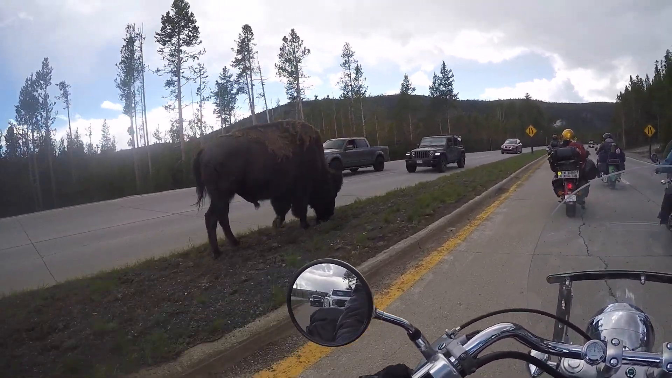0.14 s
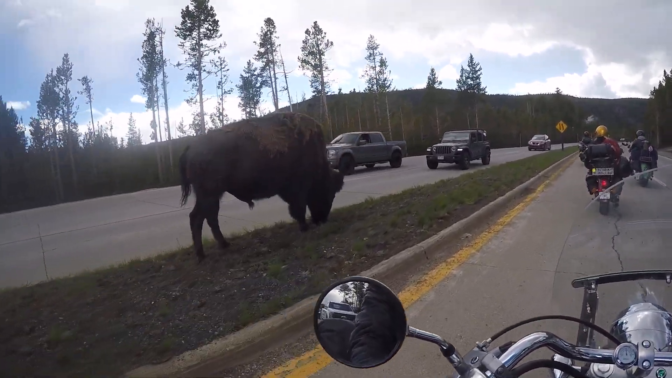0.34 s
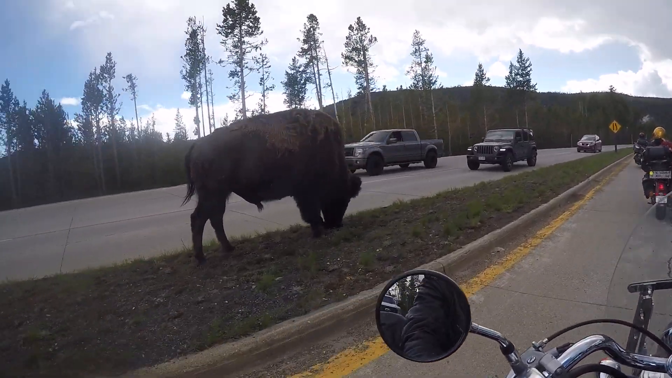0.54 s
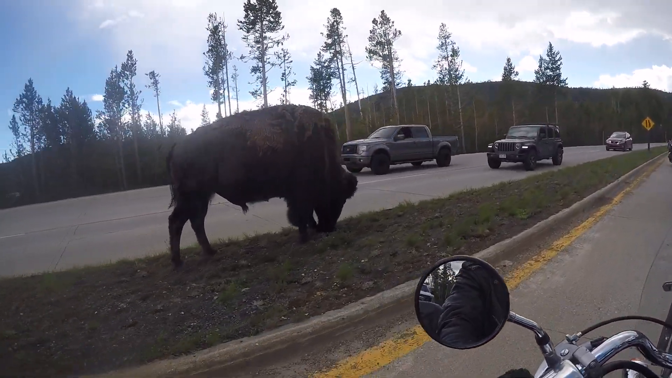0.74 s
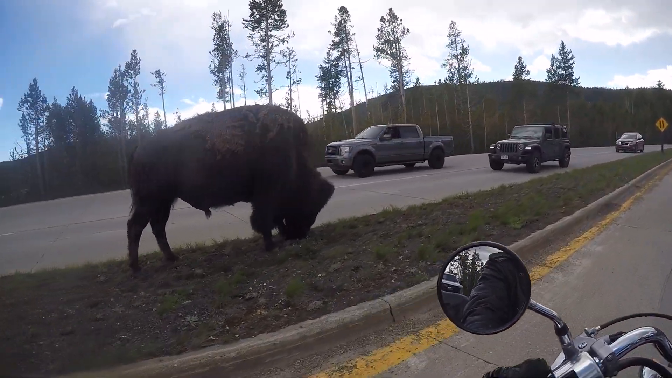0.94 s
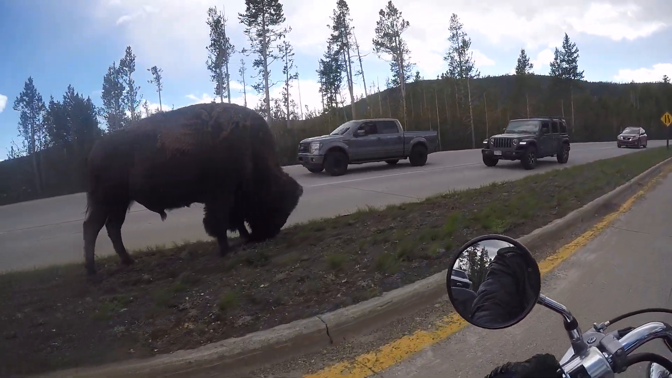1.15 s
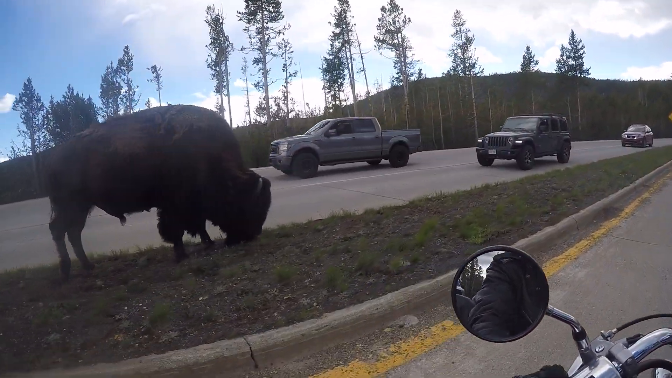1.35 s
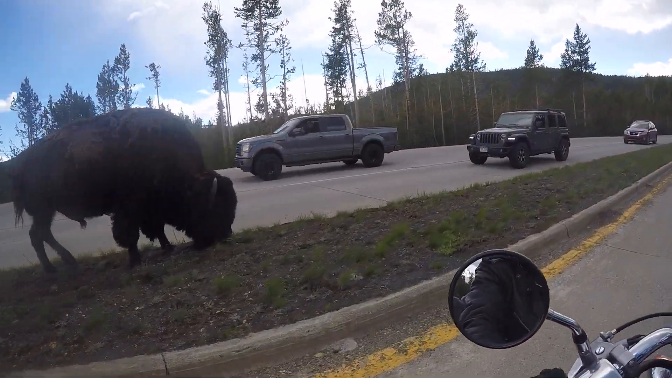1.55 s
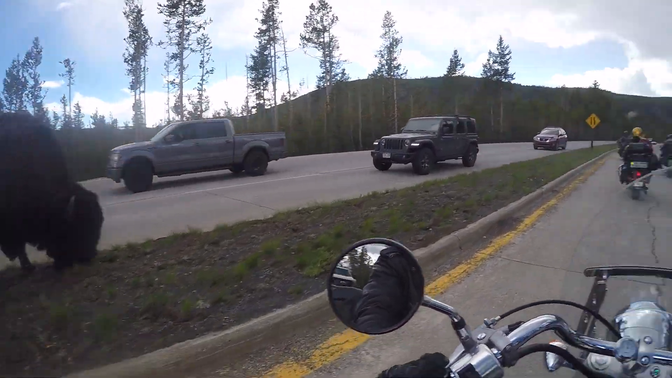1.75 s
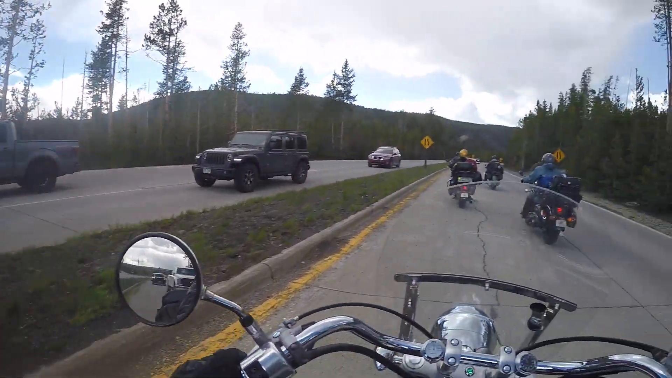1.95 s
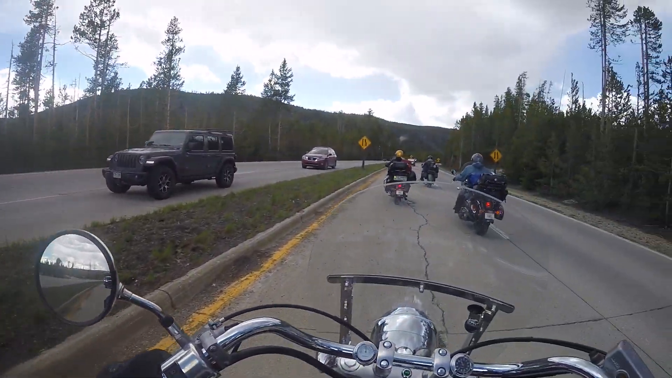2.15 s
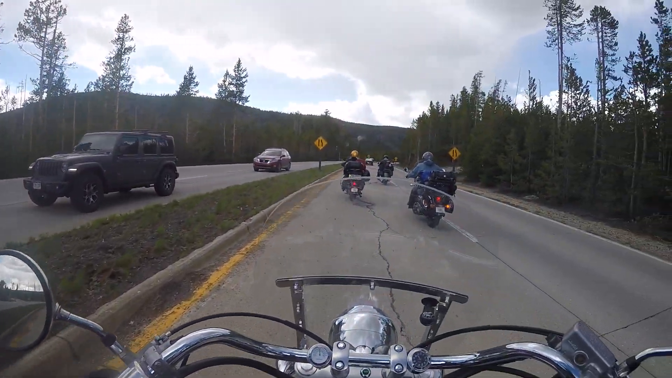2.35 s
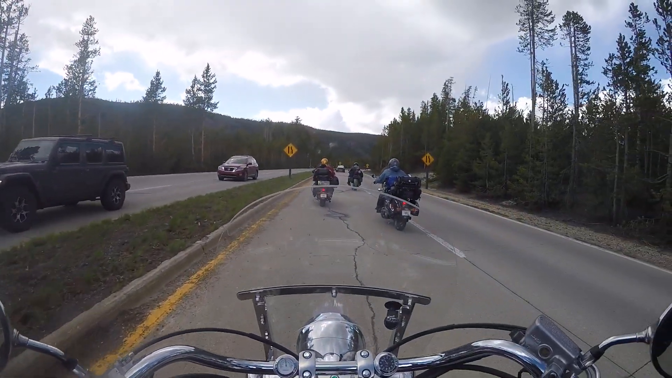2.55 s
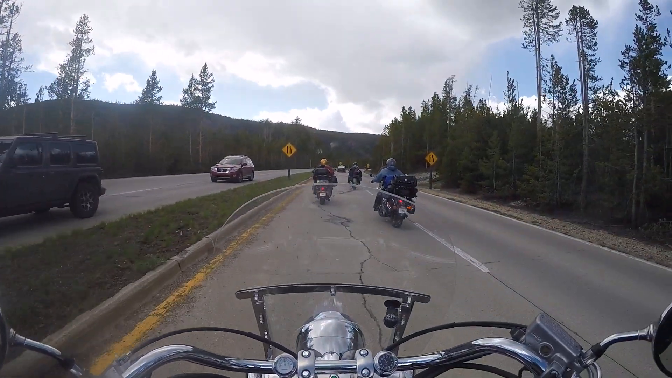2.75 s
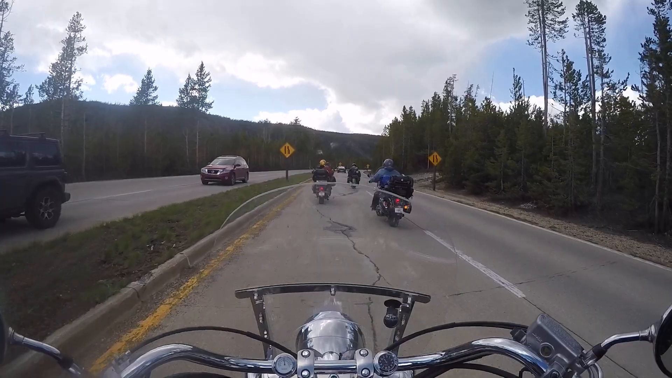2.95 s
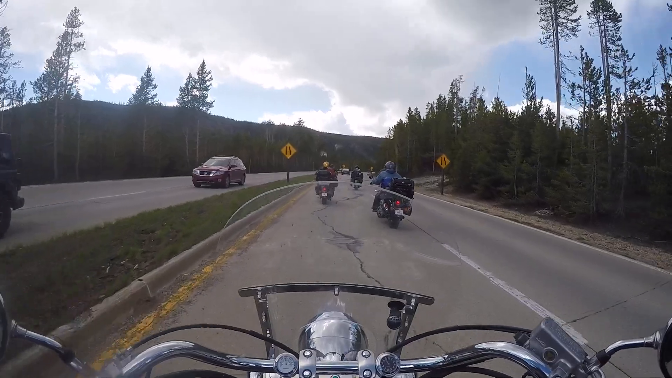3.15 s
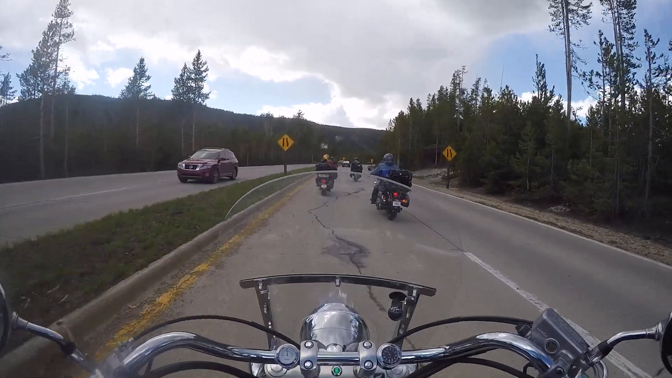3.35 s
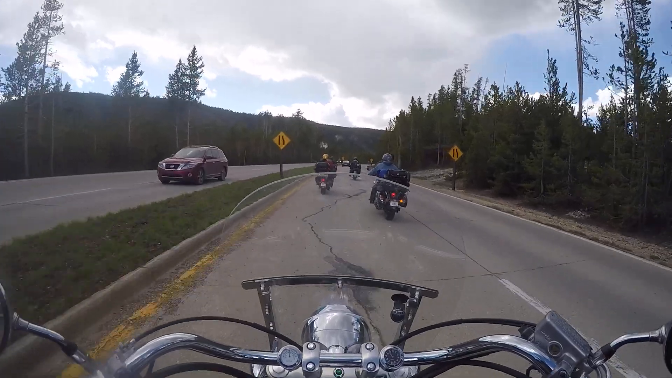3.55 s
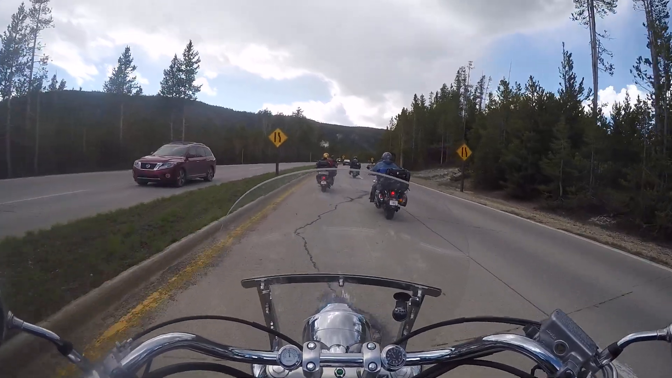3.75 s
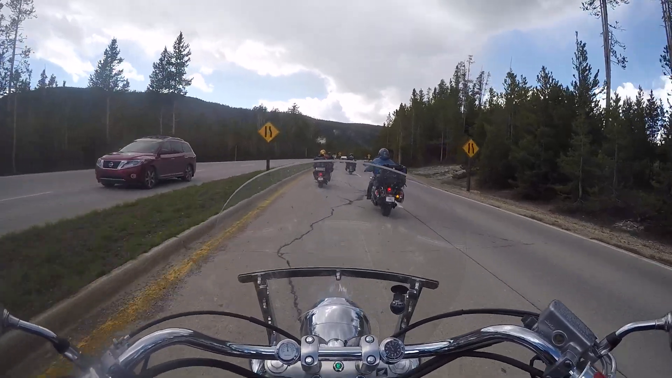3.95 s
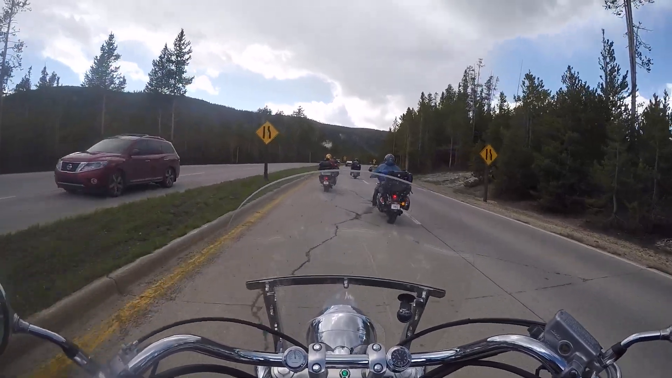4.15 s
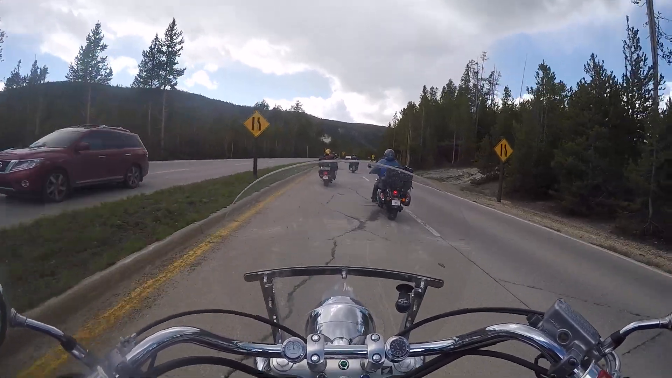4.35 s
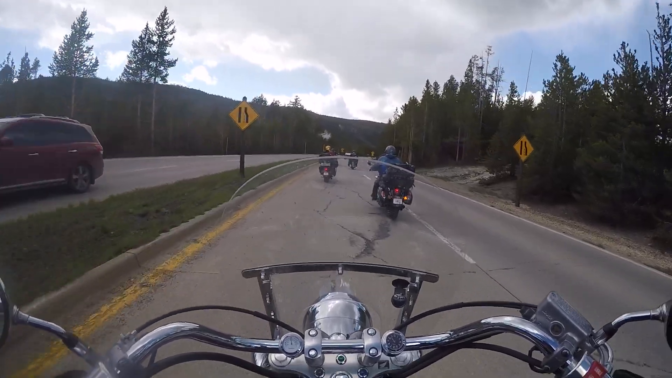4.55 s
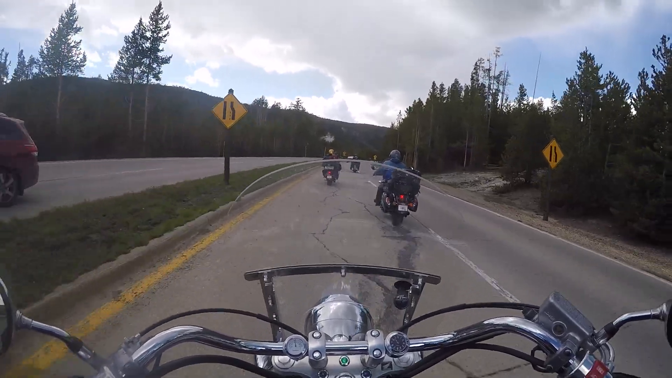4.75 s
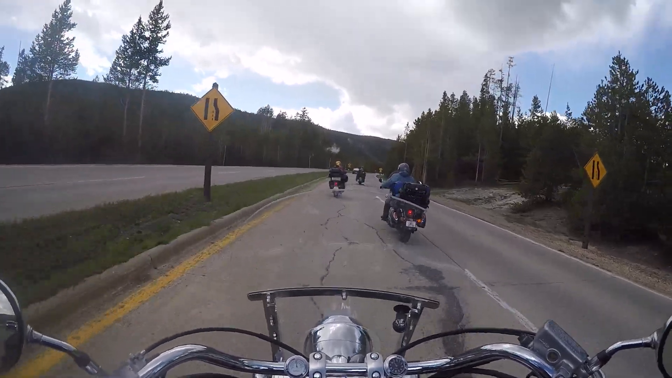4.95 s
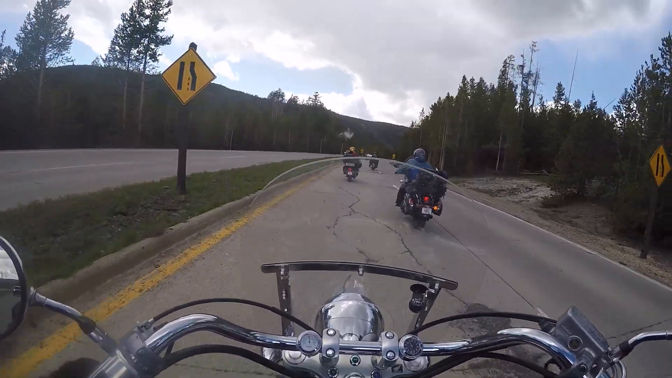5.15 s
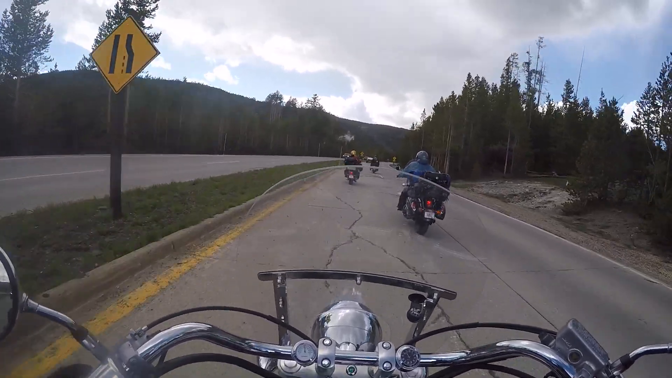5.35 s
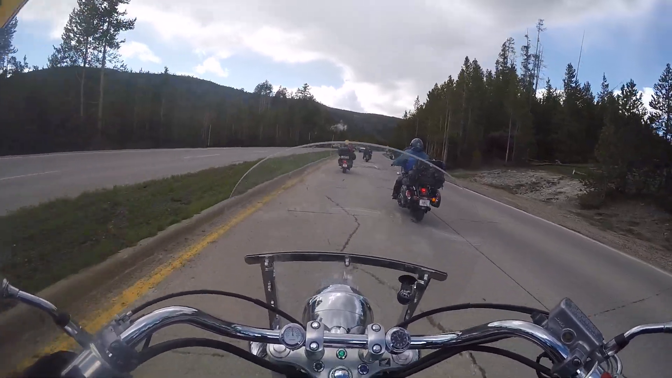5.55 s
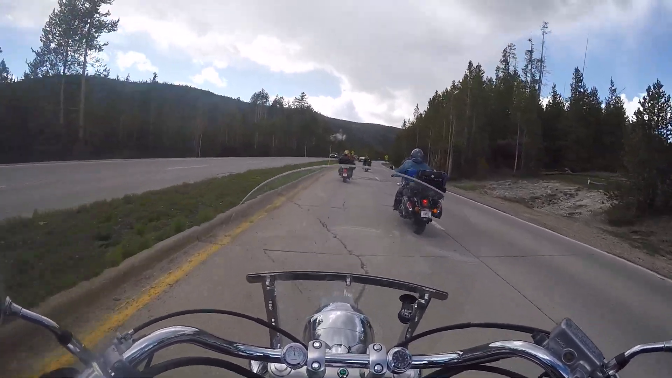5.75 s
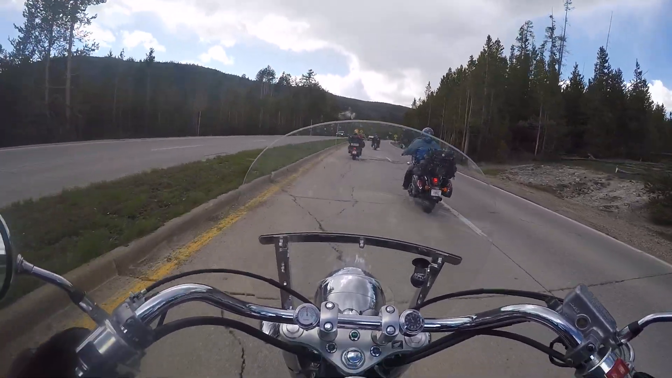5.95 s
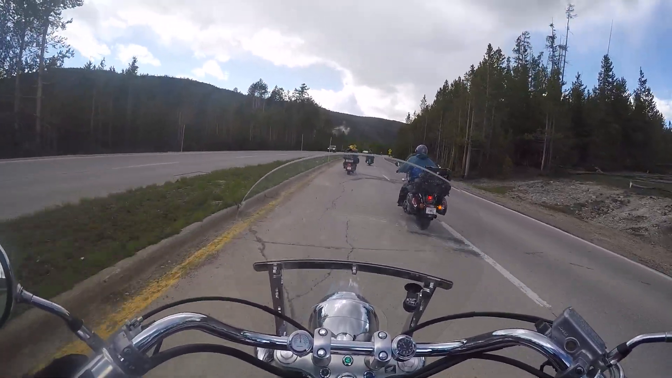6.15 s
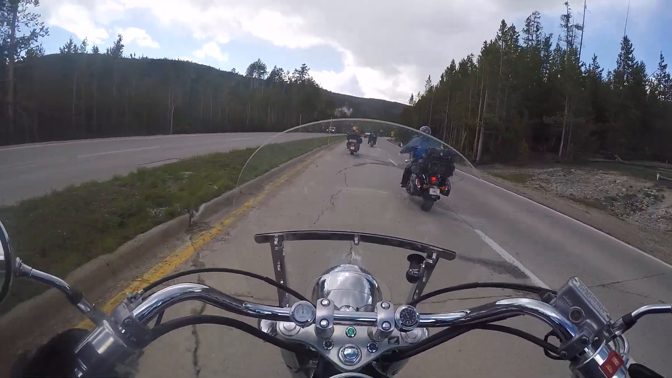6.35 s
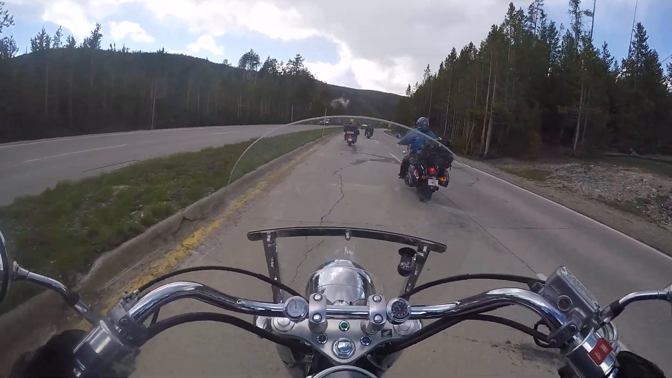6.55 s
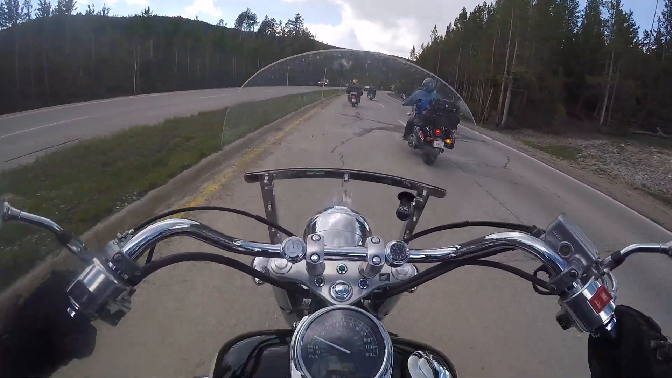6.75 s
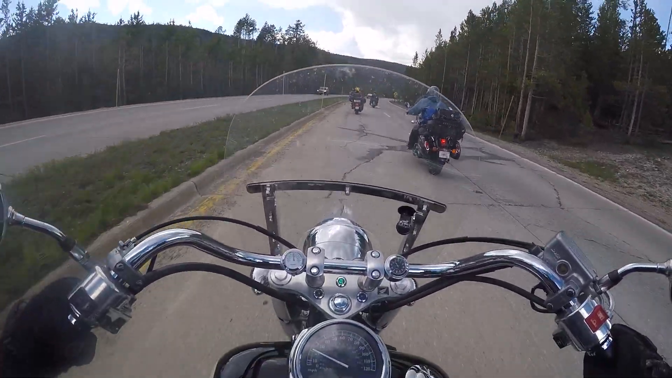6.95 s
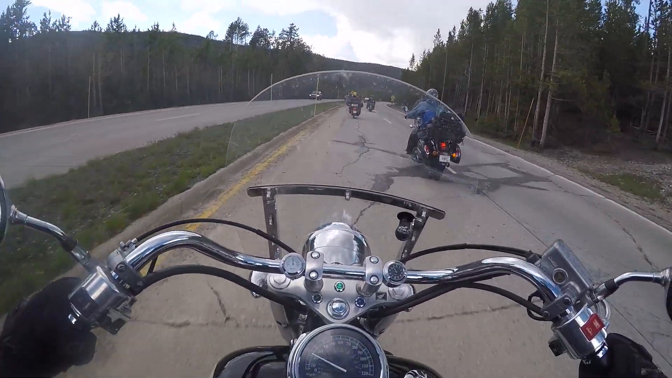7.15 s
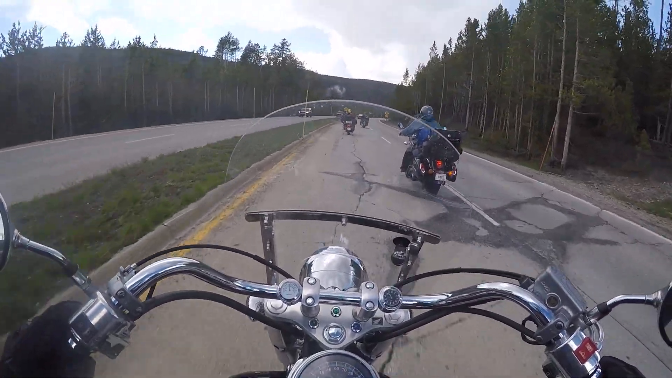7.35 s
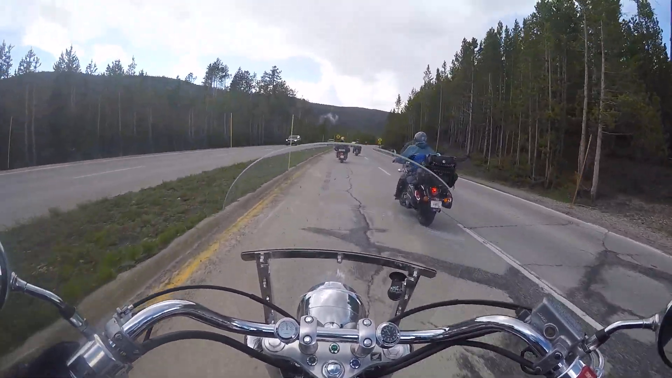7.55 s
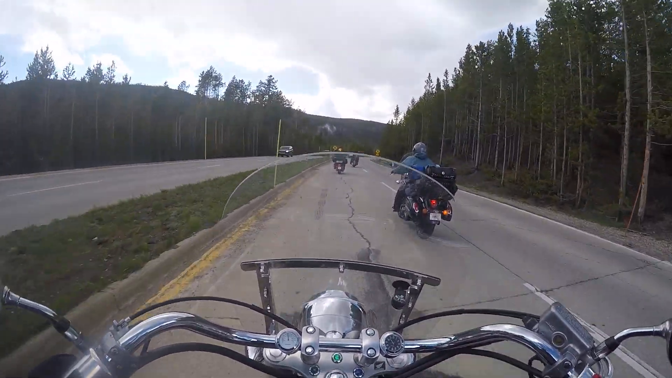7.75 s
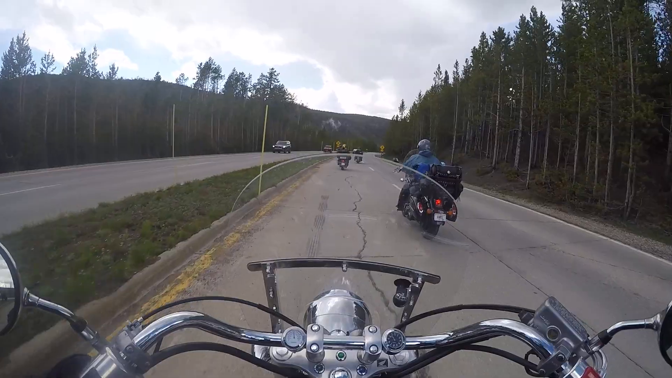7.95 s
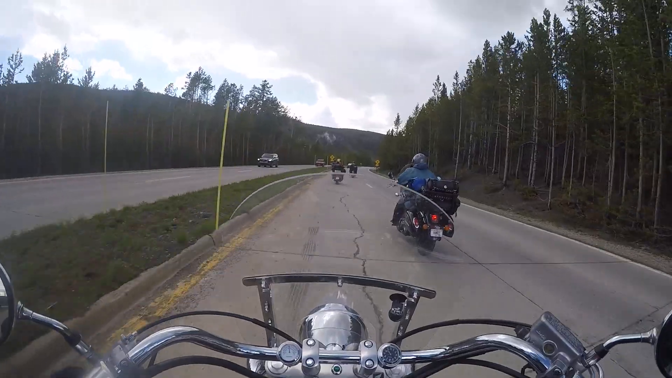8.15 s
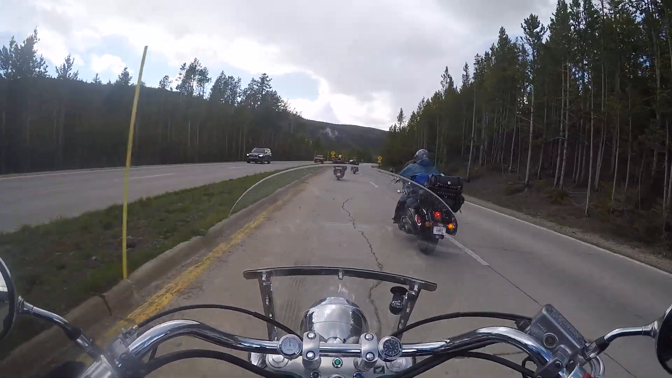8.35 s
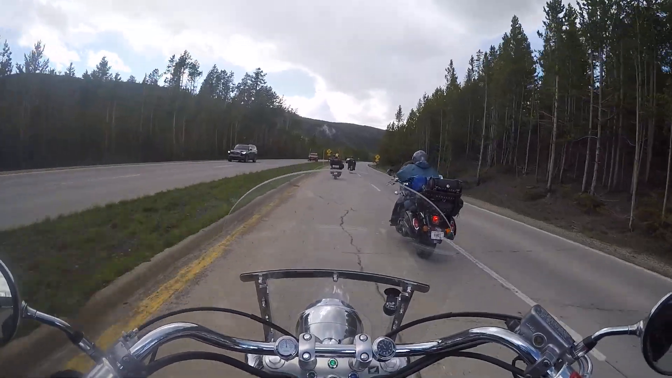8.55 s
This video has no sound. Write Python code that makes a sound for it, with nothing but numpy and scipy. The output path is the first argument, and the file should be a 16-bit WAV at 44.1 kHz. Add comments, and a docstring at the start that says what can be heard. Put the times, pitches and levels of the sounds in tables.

```python
"""An open concrete road, from the saddle of a V-twin cruiser pulling away beside a companion.
The ridden bike's uneven firings thump in the silencers, air rasps through its valves and its tappets tick.
The companion revs higher: its pipes drone, bark and crack, loose metal rattles and drive gears whine.
Each changes up once, while two more bikes rumble ahead and fade. Tyres hiss, and as the pace builds
the wind buffets the microphone's case harder; that case colours the whole mix."""
import sys
import numpy as np
from scipy import signal
from scipy.fft import rfft, irfft, next_fast_len
from scipy.io import wavfile

SR = 44100
rng = np.random.default_rng(int(sys.argv[2]) if len(sys.argv) > 2 else 0)


def master_out(mix):
    """Clip the mix to full scale and print it as 16-bit PCM to the path in sys.argv[1]."""
    frames = np.transpose(np.atleast_2d(mix))
    ceiling = np.clip(frames, -1, 1)
    pcm = np.round(ceiling * 32767).astype(np.int16)
    wavfile.write(sys.argv[1], SR, pcm)


N = 379701
TIME = np.arange(N) / SR

# The tone of each layer. Each row: frequency in Hz, relative spectral level in dB.
BUFFET_EQ = [(8, -15.5), (15, -12), (18.5, 2.5), (22, -10.5), (35, -9.5), (55, -18.5), (90, -11),
             (200, -23.5), (500, -51), (1500, -66)]  # wind on the case
RUSH_EQ = [(60, 0), (250, 1), (520, -1), (680, -2), (1000, -1), (1250, 0), (1700, 2), (3000, -1),
           (5400, -6), (6300, -12), (9000, -15), (11000, -24), (16000, -29)]  # wind, tyres and gas
RUMBLE_EQ = [(25, -23), (60, -13.5), (95, 1), (135, -6), (185, -5), (235, -3.5), (300, -17), (400, -19),
             (560, -22.5), (620, -21), (680, -59), (1500, -53)]  # bikes ahead, dulled by distance
DRONE_EQ = [(20, -9), (60, -0.5), (100, 8), (160, -1), (210, -1.5), (290, 5.5), (350, -8), (425, -1),
            (500, -11), (590, -13), (680, -18), (1200, -45), (2500, -49)]  # companion's pipes
BARK_EQ = [(300, -15), (500, -16), (630, -11), (730, 8.5), (810, -2.5), (930, 5.5), (1200, -5), (1400, -10),
           (1750, -4.5), (2500, -13), (5000, -34)]  # its pulses under load
CRACK_EQ = [(500, -31), (1100, -21), (1700, -4.5), (3000, -25.5), (4200, 6.5), (5400, 4.5), (6050, 0),
            (6500, -7.5), (8200, -4.5), (9400, -9), (10300, -12.5), (13500, -14.5), (15500, -16.5)]  # puffs leaving its pipes
TICK_EQ = [(500, -41), (800, -21), (1300, -9), (1700, -5), (2600, 7), (4000, -2), (5400, -6), (6100, -13),
           (8800, -10.5), (11000, -19.5), (16000, -50)]  # ridden bike's tappets
RASP_EQ = [(300, -39), (900, -19), (1200, -3), (1500, -15.5), (1650, -2.5), (2100, -1), (2800, 1),
           (3600, -3), (4500, -7), (5500, -14.5), (6200, -12.5), (8000, -24), (11000, -33), (16000, -39)]  # air through its valves
THUMP_EQ = [(15, -8.5), (40, -13), (62, -14), (82, -3), (100, 6.5), (125, 1.5), (158, 3.5), (200, -11),
            (250, -7), (340, -23.5), (560, -20.5), (670, -38), (1500, -74.5)]  # its silencers
# Resonances and hollows of the case. Each row: centre in Hz, width in Hz, gain in dB.
CASE_EQ = [(718, 12, 1.5), (756, 17, 1.5), (897, 61, 5.5), (1195, 43, -21.5), (1377, 49, 5.5),
           (1663, 160, 6), (1855, 160, 6.5), (2030, 81, -5), (2440, 51, 3), (2954, 35, 7),
           (3420, 160, -1.5), (5550, 130, 4), (6010, 330, -7.5), (9160, 210, -1.5)]
# The companion's loose metal. Each row: mode frequency in Hz, level in dB, time to fall 60 dB in seconds.
METAL_MODES = [(2585, -7.5, 0.075), (2950, -8.5, 0.016), (3970, 4, 0.012), (4360, -2.5, 0.027),
               (5200, 6, 0.0048), (5290, -7, 0.034), (6380, -2.5, 0.02), (8040, -7, 0.017),
               (9000, -20, 0.0057), (9170, 2, 0.011)]
# Echoes inside the pipes and silencer chambers. Each entry: a pulse's round trip in seconds.
PIPE_TRIPS_S = [0.003203, .0067, .0113]
# Clicks of the valve gear. Each row: place in the cycle from 0 to 1, level in dB.
TAPPET_CLICKS = [(.04, -18), (.42, -13), (0.588, 1.5), (0.857, 2)]
# Voicing of the pipes. Each entry: boost or cut in dB for a multiple of the cycle rate, from the second up.
RIDDEN_HARMONICS_DB = [-3, -8, -8, 3.5, 3.5, 1.5, 0.5, 3]
COMPANION_HARMONICS_DB = [-7, -3.5, -7, 1.5, 1, 2.5, -0.5, -1.5, 2, 7.5, 2, -0.5]
# The companion's drive gears. Each entry: a tone's pitch as a multiple of the cycle rate.
GEAR_MULTIPLES = [18, 23, 28]

# Engine speed. Each row: time in seconds, four-stroke cycles per second.
RIDDEN_REVS = [(0, 11.01), (1.22, 11.81), (1.57, 14.55), (1.79, 12.9), (2.16, 19.56), (2.68, 17.67),
               (3.06, 14.91), (3.9, 20.87), (4.78, 26.64), (5.11, 17.15), (5.79, 17.2), (8.61, 23.77)]  # rolls, takes up the clutch, pulls, changes up, pulls again
COMPANION_REVS = [(0, 11.12), (.34, 9.54), (1.38, 12.72), (2.99, 16.73), (4.12, 20.73), (6.35, 29.45),
                  (6.66, 21.43), (7.06, 19.19), (8.61, 22.26)]  # one long pull, then a change up
# The two bikes ahead. Each row: time in seconds, cycles per second of one, then of the other.
GROUP_REVS = [(0, 12.5, 9), (1.2, 15, 11.5), (2.3, 18.5, 17), (3.2, 22, 19), (5, 19, 24), (8.61, 24, 21)]
# Throttle moves. Each row: time in seconds, opening from 0 to 1.
RIDDEN_OPENING = [(0, 0.06), (.9, 0.13), (1.6, 0.39), (2.25, 0.5), (2.6, 0.92), (3.7, 1), (4.85, 0.91),
                  (4.96, 0.26), (5.55, 0.53), (6, 0.88), (6.75, 0.94), (8.45, 0.88), (8.61, 0.54)]
COMPANION_OPENING = [(0, 0.52), (1.4, 0.57), (2, 0.75), (3.5, 0.92), (4.5, 0.84), (5.3, 0.82), (5.7, 0.83),
                     (6.36, 0.91), (6.44, 0.27), (6.7, 0.2), (6.97, 0.75), (7.75, 1), (8.61, 0.99)]
# Pace along the road. Each row: time in seconds, speed in metres per second.
ROAD_PACE = [(0, 3.5), (1.8, 3.8), (2.8, 5.1), (3.8, 9.4), (5, 10.8), (8.61, 12.8)]

# Swells on single layers. Each row: start in seconds, end in seconds, lift in dB.
GUST_SWELLS = [(4.95, 5.08, 4), (5.38, 5.5, 3.5), (7.45, 7.8, 3.5)]  # gusts strike the case
RATTLE_SWELLS = [(4.6, 5.6, 10.5), (5.95, 6.36, 10.5), (6.97, 7.35, 11)]  # the loose metal shakes harder
BARK_SWELLS = [(1.9, 6.36, 4.5), (1.9, 3.6, 4)]  # through first gear, most as the companion draws past
CRACK_SWELLS = [(6.22, 6.36, 3), (6.98, 7.3, 2.5)]  # at the top of its pull, and as it picks up again
CLATTER_SWELLS = [(1.25, 1.6, 4.5)]  # the valve gear clatters as the clutch begins to bite

CRUISE_CYCLES_PER_S, CRUISE_M_PER_S = 20, 12  # the revs and pace at which levels are set


def from_db(db):
    """Decibels to gain."""
    return 10 ** (np.asarray(db) / 20)


def unit_power(x):
    """Scale to an RMS of one."""
    return x / np.sqrt(np.mean(x ** 2) + 1e-20)


def curves(rows):
    """One smooth control curve for each column after the time."""
    times, *columns = np.transpose(rows)
    return [np.interp(TIME, times, column) for column in columns]


def swells(rows, attack_s, release_s):
    """A lift in dB that builds before each start, holds to the end and then dies away."""
    return sum(np.interp(TIME, [start - attack_s, start, end, end + release_s], [0, db, db, 0])
               for start, end, db in rows)


def drift(per_s):
    """A wobble that glides between random values of spread 1."""
    knots = rng.standard_normal(4000)
    return np.interp(TIME * per_s, np.arange(len(knots)), knots)


def flutter(spread_db, per_s):
    """A randomly wavering gain, held within twice its spread."""
    return from_db(spread_db * np.clip(drift(per_s), -2, 2))


def causal_filter(x, db_at, size=16384):
    """Minimum-phase filter with the response db_at(Hz): it rings only after each impulse."""
    hz = np.maximum(np.arange(size // 2 + 1) * SR / size, 1)
    cepstrum = irfft(np.log(from_db(db_at(hz))))
    cepstrum[1:size // 2] *= 2
    cepstrum[size // 2 + 1:] = 0
    return signal.oaconvolve(x, irfft(np.exp(rfft(cepstrum))))[:N]


def coloured(x, eq):
    """Shape x with an EQ curve that rolls off beyond its ends, then bring it to unit power."""
    points_hz, db = np.transpose(eq)
    octaves = np.log2(np.r_[points_hz[0] / 10, points_hz, points_hz[-1] * 10])
    db = np.r_[db[0] - 40, db, db[-1] - 60]
    return unit_power(causal_filter(x, lambda hz: np.interp(np.log2(hz), octaves, db)))


def patchy_noise(patchy_db, per_s, bands=12):
    """Turbulence whose treble bands swell and fade separately, so no two puffs have the same colour."""
    edges_hz = np.geomspace(1500, 16000, bands + 1)
    white = rng.standard_normal((2, N))
    out = signal.sosfilt(signal.butter(2, edges_hz[0], fs=SR, output="sos"), white[1])
    for k in range(bands):
        band_pass = signal.butter(2, edges_hz[k:k + 2], "band", fs=SR, output="sos")
        out += signal.sosfilt(band_pass, white[k % 2]) * unit_power(flutter(patchy_db, per_s))
    return out


def puffs(impulses, rise_s, decay_s, patchy_db):
    """Each impulse lets out a puff of turbulent noise."""
    age = np.arange(4096) / SR
    envelope = (1 - np.exp(-age / rise_s)) * np.exp(-age / decay_s)
    return signal.oaconvolve(impulses, envelope)[:N] * patchy_noise(patchy_db, per_s=50)


def strokes(revs, place, jitter, uneven_db, count=256):
    """One impulse per engine cycle at a given place in it, each a little off in time and strength."""
    cycles = np.cumsum(revs) / SR
    timing, strength = rng.standard_normal((count, 2)).T
    due = np.arange(count) + place + jitter * timing
    heard = (due > 0) & (due < cycles[-1])
    at = np.searchsorted(cycles, due[heard])
    out = np.zeros(N)
    out[at] = from_db(uneven_db * np.clip(strength[heard], -2, 2))
    return out / np.sqrt(revs)  # equal power at any revs


def effort(revs, throttle, db, octave_db, shut_db):
    """Engine gain: db at cruising revs, up octave_db per doubling, down shut_db with the throttle shut."""
    return from_db(db + octave_db * np.log2(revs / CRUISE_CYCLES_PER_S) - shut_db * (1 - throttle))


def pipe_voicing(revs, pattern, harmonics_db):
    """Clean tones that boost or cut the low harmonics of a firing pattern of (place in the cycle, gain)."""
    cycles, out = np.cumsum(revs) / SR, 0
    for multiple, db in enumerate(harmonics_db, 2):
        weight = sum(gain * np.exp(-2j * np.pi * multiple * place) for place, gain in pattern)
        harmonic = abs(weight) * np.cos(2 * np.pi * multiple * cycles + np.angle(weight))
        out += (from_db(db) - 1) * harmonic
    return out * 2 * np.sqrt(revs) / SR  # on the scale of the strokes


def in_pipes(x, reflection=0.5):
    """Each pulse bounces to and fro before it has all come out, which rounds it into a throb."""
    size = next_fast_len(N + SR)
    hz, spectrum = np.arange(size // 2 + 1) * SR / size, rfft(x, size)
    for trip_s in PIPE_TRIPS_S:
        delay = np.exp(-2j * np.pi * hz * trip_s)
        spectrum *= (delay - reflection) / (1 - reflection * delay)
    return irfft(spectrum, size)[:N]


def bikes_ahead(leave_s=2.5, swell_db_per_s=4.5, fade_db=12, fade_s=0.79):
    """Two exhausts blend into a low rumble that swells as they open up and fades as they leave."""
    swell = swell_db_per_s * np.minimum(TIME - leave_s, 0)
    fade = fade_db * (1 - np.exp(-np.maximum(TIME - leave_s, 0) / fade_s))
    firings = sum(strokes(revs, place, jitter=0.0036, uneven_db=4.5)
                  for revs in curves(GROUP_REVS) for place in (.1, .52))
    return from_db(-29 + swell - fade) * coloured(in_pipes(firings), RUMBLE_EQ)


def wind_buffet(pace_octaves):
    """Wind beats on the case: a lumpy low end that grows with the pace and jumps in gusts."""
    level_db = -20.5 + 6 * pace_octaves + swells(GUST_SWELLS, attack_s=0.1, release_s=0.088)
    return from_db(level_db + 0.27 * drift(10)) * coloured(rng.standard_normal(N), BUFFET_EQ)


def air_rush(pace_octaves, ridden, beside):
    """One smooth noise bed for wind and tyres, the ridden bike's hiss and the companion's roar of gas."""
    road = from_db(-50 + 1.5 * pace_octaves)
    hiss = effort(*ridden, db=-37, octave_db=11.5, shut_db=5.5)
    roar = effort(*beside, db=-42, octave_db=9.5, shut_db=15) * bark_lift()
    gain = np.sqrt(road ** 2 + hiss ** 2 + roar ** 2) * from_db(0.26 * drift(14))
    return gain * coloured(rng.standard_normal(N), RUSH_EQ)


def gear_whine(revs, throttle, tones_db=(-43, -43.5, -43.5), ring_hz=(370, 528)):
    """Meshing teeth sing fluttering tones; each stands out as the revs carry it into the gear case's ring."""
    cycles = np.cumsum(revs) / SR
    tones = sum(from_db(db) * flutter(spread_db=3, per_s=14) * np.sin(2 * np.pi * multiple * cycles)
                for multiple, db in zip(GEAR_MULTIPLES, tones_db))
    gear_case = signal.butter(2, ring_hz, "band", fs=SR, output="sos")
    return from_db(-5.5 * (1.5 - throttle)) * signal.sosfilt(gear_case, tones)


def metal_rattle(firings):
    """Each firing strikes every mode of the loose metal with a strength of its own."""
    knocks = puffs(firings, rise_s=0.00018, decay_s=0.0012, patchy_db=3)
    ringing = 0
    for hz, db, t60 in METAL_MODES:
        radius, angle = from_db(-60 / (t60 * SR)), 2 * np.pi * hz / SR
        strikes = knocks * from_db(db) * flutter(spread_db=4.5, per_s=60)
        feedback = [1, -2 * radius * np.cos(angle), radius ** 2]
        ringing += signal.lfilter([0, np.sin(angle)], feedback, strikes + 1e-18)
    low_pass = signal.butter(2, 10500, fs=SR, output="sos")
    dulled = signal.sosfilt(low_pass, signal.sosfilt(low_pass, ringing))
    return from_db(swells(RATTLE_SWELLS, attack_s=0.16, release_s=0.19)) * unit_power(dulled)


def exhaust_crack(firings):
    """Each firing leaves the pipe as a short, bright puff of gas."""
    gas = puffs(firings, rise_s=.0002, decay_s=.0024, patchy_db=5.5)
    return from_db(swells(CRACK_SWELLS, attack_s=0.18, release_s=0.042)) * coloured(gas, CRACK_EQ)


def bark_lift():
    """Extra gain on the companion's bark and roar through first gear."""
    return from_db(swells(BARK_SWELLS, attack_s=0.33, release_s=0.35))


def companion_bike(revs, throttle, front_db=-5, front_crack_db=-2.5):
    """Firings drone in the pipes, crack at their ends and shake metal; under load they steepen to a bark."""
    pattern = [(.178, from_db(front_db)), (.58, 1)]
    front, rear = [strokes(revs, place, jitter=.0024, uneven_db=1.2) for place, _ in pattern]
    firings = from_db(front_db) * front + rear
    drone = coloured(in_pipes(firings + pipe_voicing(revs, pattern, COMPANION_HARMONICS_DB)), DRONE_EQ)
    bark = bark_lift() * coloured(firings, BARK_EQ)
    crack = exhaust_crack(from_db(front_crack_db) * front + rear)
    return (drone * effort(revs, throttle, db=-26, octave_db=11, shut_db=13.5)
            + bark * effort(revs, throttle, db=-48, octave_db=16.5, shut_db=11.5)
            + crack * effort(revs, throttle, db=-30, octave_db=3, shut_db=41.5)
            + metal_rattle(firings) * effort(revs, throttle, db=-41, octave_db=7, shut_db=10)
            + gear_whine(revs, throttle))


def clutch_clack(at_s=1.502, decay_s=0.0075):
    """As the clutch bites, one hard contact in the drive rings the same metal as the tappets."""
    age = np.maximum(TIME - at_s, 0)
    envelope = (age > 0) * np.exp(-np.minimum(age / decay_s, 20))
    return from_db(-53) * coloured(envelope * rng.standard_normal(N), TICK_EQ)


def valve_ticks(revs):
    """Tappets click at set places in every cycle, never twice with the same strength."""
    level_db = -37.5 + 7 * np.log2(revs / CRUISE_CYCLES_PER_S)
    clatter_db = swells(CLATTER_SWELLS, attack_s=0.3, release_s=.1)
    taps = sum(from_db(db) * strokes(revs, place, jitter=.007, uneven_db=2.2)
               for place, db in TAPPET_CLICKS)
    clicks = puffs(taps, rise_s=0.00012, decay_s=0.006, patchy_db=8.5)
    return from_db(level_db + clatter_db) * coloured(clicks, TICK_EQ)


def throttle_rasp(revs, throttle, attack_cycles=0.013, decay_cycles=0.25, uneven_db=1.5, leak_db=-21):
    """Air tears through each cylinder's valve for part of the cycle, hardest just after it opens."""
    cycles, flow = np.cumsum(revs) / SR, from_db(leak_db)
    for opens, cylinder_db in [(.415, 1.6), (.84, -2.1)]:
        turn, age = np.divmod(cycles - opens + 1, 1)
        strength = from_db(cylinder_db + uneven_db * rng.standard_normal(256))[turn.astype(int)]
        flow += strength * np.minimum(age / attack_cycles, 1) * np.exp(-(age / decay_cycles) ** 1.64)
    turbulence = patchy_noise(patchy_db=3, per_s=60)
    grain = from_db(-1.5 * drift(500))
    rasp = coloured(flow * turbulence * grain, RASP_EQ)
    return rasp * effort(revs, throttle, db=-24, octave_db=1.5, shut_db=24)


def exhaust_thump(revs, throttle, rear_db=-8.5):
    """Two unevenly spaced, unequal firings per cycle boom in the ridden bike's silencers."""
    pattern = [(.42, 1), (.84, from_db(rear_db))]
    firings = sum(gain * strokes(revs, place, jitter=.002, uneven_db=.9) for place, gain in pattern)
    boom = coloured(in_pipes(firings + pipe_voicing(revs, pattern, RIDDEN_HARMONICS_DB)), THUMP_EQ)
    return boom * effort(revs, throttle, db=-20, octave_db=6, shut_db=13)


def scene():
    """The mono mix of bikes and moving air; revs and throttle play the two near engines."""
    (revs,), (throttle,) = curves(RIDDEN_REVS), curves(RIDDEN_OPENING)
    beside = (*curves(COMPANION_REVS), *curves(COMPANION_OPENING))
    pace_octaves = np.log2(curves(ROAD_PACE)[0] / CRUISE_M_PER_S)
    ridden_bike = exhaust_thump(revs, throttle) + throttle_rasp(revs, throttle) + valve_ticks(revs)
    other_bikes = companion_bike(*beside) + bikes_ahead()
    air = wind_buffet(pace_octaves) + air_rush(pace_octaves, (revs, throttle), beside)
    return (ridden_bike + other_bikes + air + clutch_clack())[None]


def record(dry, ceiling=0.9, cutoff_hz=15600):
    """The case colours everything, the highest peaks are rounded and the top end is cut."""
    boxed = causal_filter(dry[0], lambda hz: sum(db / (1 + (2 * (hz - centre) / width) ** 2)
                                                 for centre, width, db in CASE_EQ))
    rounded = boxed / (1 + (boxed / ceiling) ** 6) ** (1 / 6)
    low_pass = signal.ellip(10, .2, 90, cutoff_hz, fs=SR, output="sos")
    return signal.sosfilt(low_pass, rounded)[None]


dry = scene()
out = record(dry)
master_out(out)
```